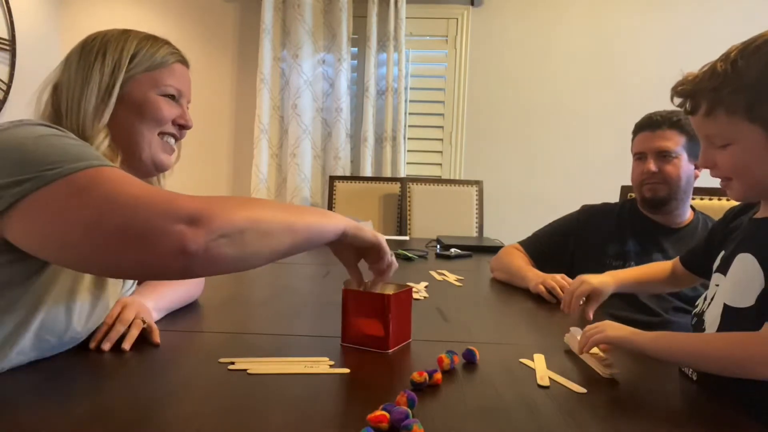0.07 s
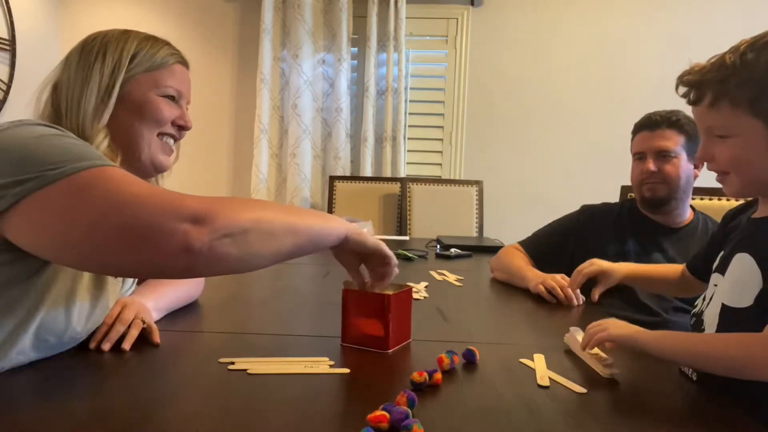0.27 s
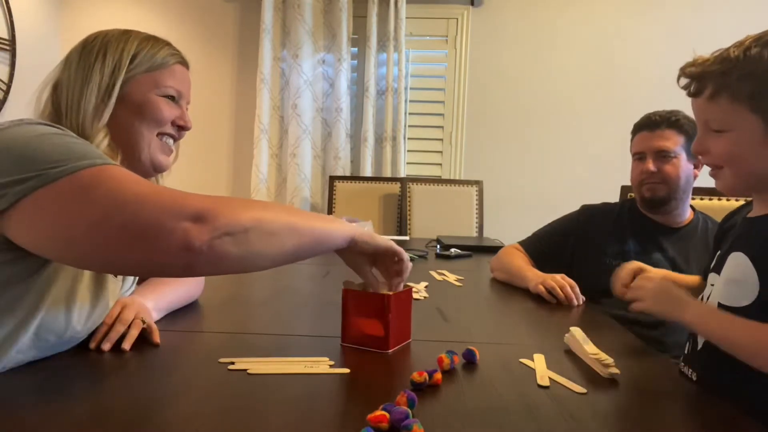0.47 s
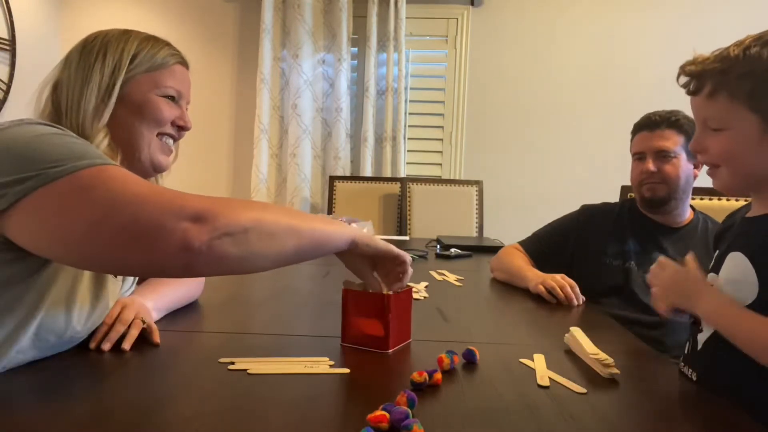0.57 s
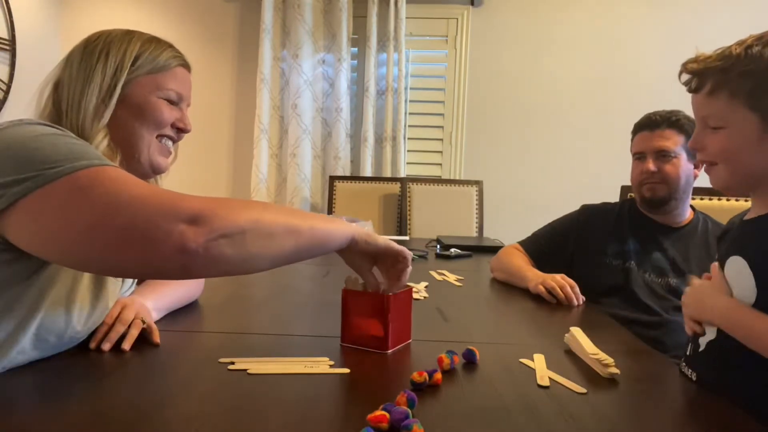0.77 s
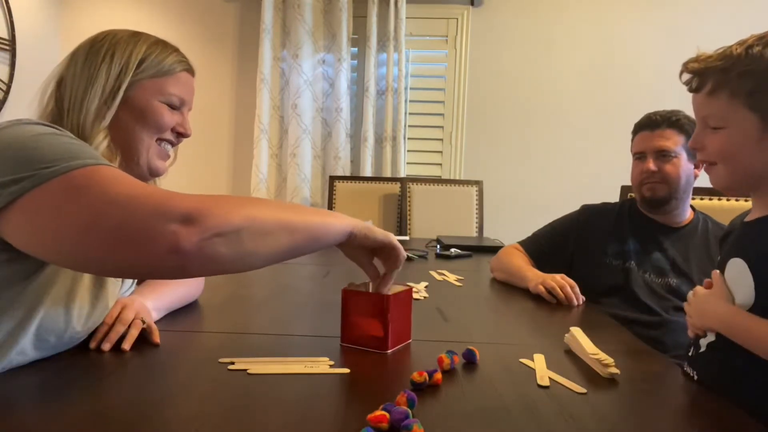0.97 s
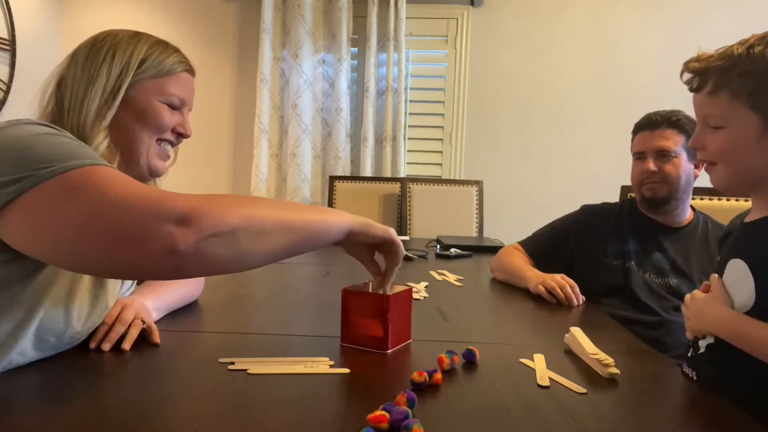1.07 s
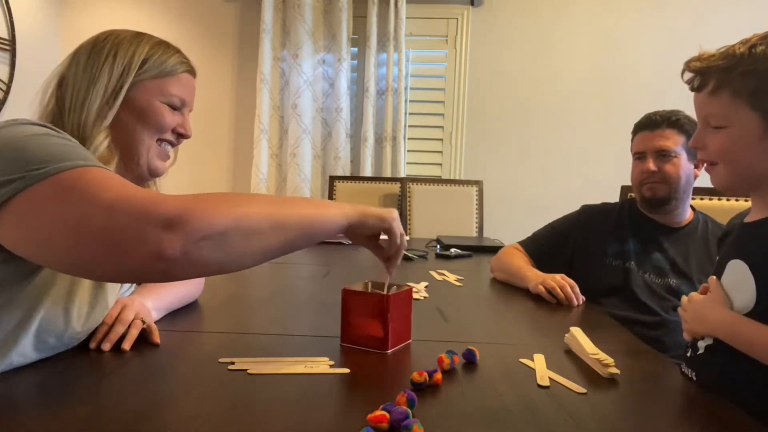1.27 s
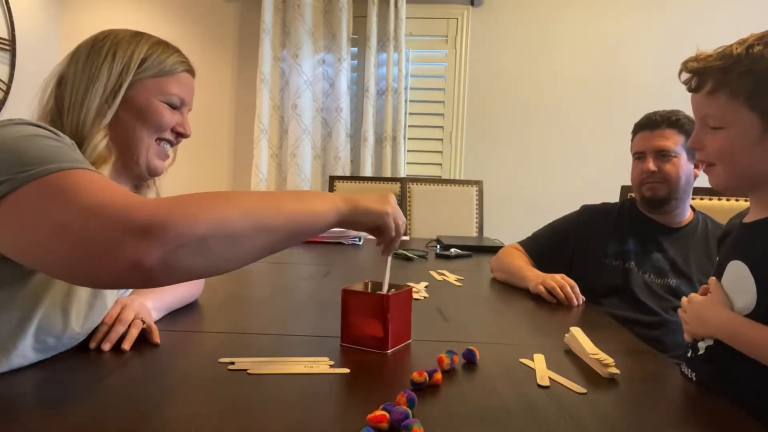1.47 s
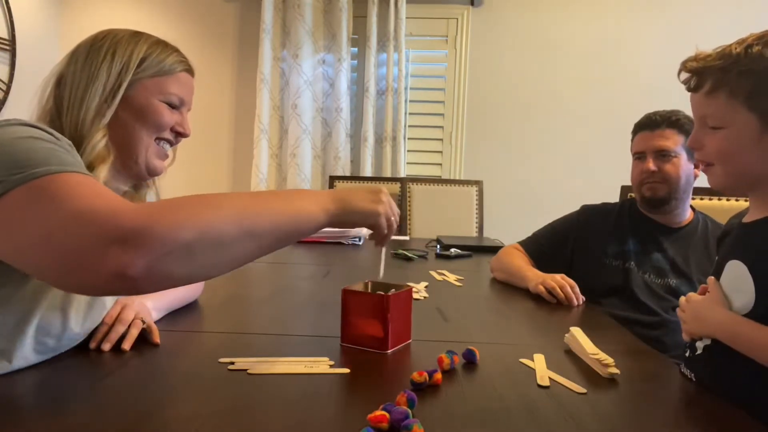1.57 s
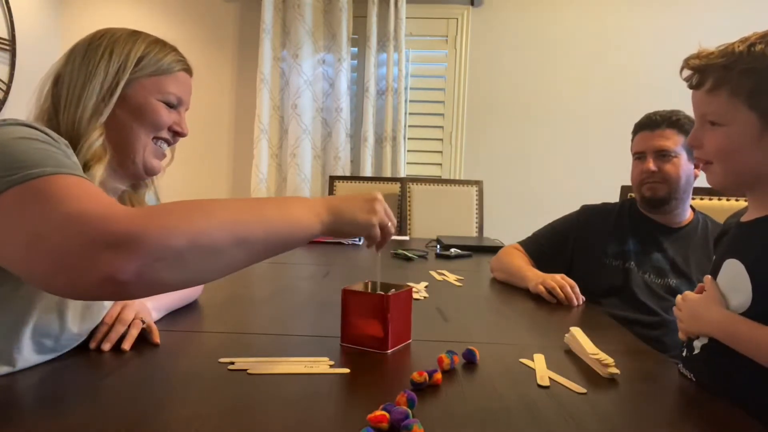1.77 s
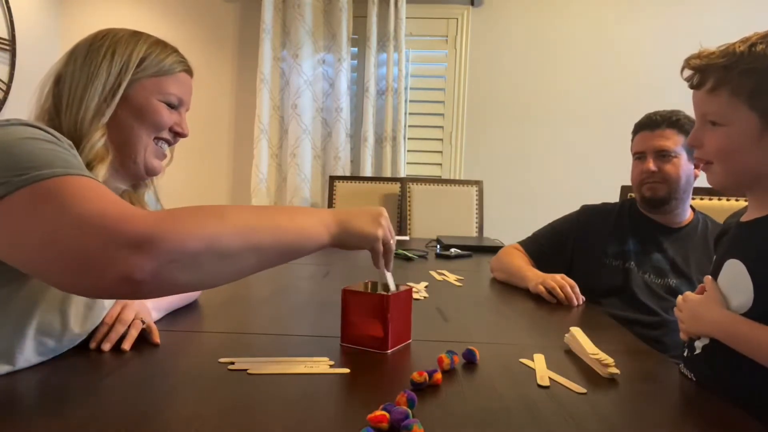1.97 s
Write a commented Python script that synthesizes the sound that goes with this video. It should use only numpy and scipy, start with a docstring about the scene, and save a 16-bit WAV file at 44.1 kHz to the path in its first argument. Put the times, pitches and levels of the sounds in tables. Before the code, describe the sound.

A hand stirs thin wooden sticks in a little tin on a dining table, giving uneven dry knocks, short tinny rings and small rattles, over very quiet low room hum, heard close in stereo with a short room tail.

```python
"""Wooden craft sticks knock in a small metal tin on a dining table as a hand rummages, a metre from a phone.
Each knock is a short chatter of contacts that rings the tin walls, the hollow of the tin and the wood.
Small rattles, made of many random contacts, fill the gaps, and one stick slides out as filtered noise.
A furnished room answers with a table bounce and a fading tail, over its low hum of filtered noise."""
import sys
import numpy as np
from scipy import signal
from scipy.fft import rfft, irfft, next_fast_len
from scipy.io import wavfile

SR = 44100
rng = np.random.default_rng(int(sys.argv[2]) if len(sys.argv) > 2 else 0)


def volts_from_decibels(level):
    """Turn decibel levels (scalar or array-like) into linear amplitude factors."""
    exponent = np.asarray(level, float) / 20
    return 10 ** exponent


def bounce(signal):
    """Save signal as a 16-bit WAV file at the path given by the first command-line argument."""
    frames = np.transpose(np.atleast_2d(signal))
    limited = np.clip(frames, -1, 1)
    pcm = np.round(limited * 32767).astype(np.int16)
    wavfile.write(sys.argv[1], SR, pcm)


N = 89126  # length of the scene [samples]


def table(x, rows, log=False):
    """Reads a table at x, with straight lines between its rows."""
    r = np.array(rows, float)
    if log:
        return np.interp(np.log(x + 1), np.log(r[:, 0]), r[:, 1])
    return np.interp(x, r[:, 0], r[:, 1])


def unit(x):
    """Scales a sound to an rms of 1."""
    return x / np.sqrt(np.mean(x ** 2))


def colour(x, rows):
    """Makes each pitch louder or softer, following (frequency [Hz], level [dB]) points."""
    n = x.shape[-1]
    hz = np.arange(n // 2 + 1) * SR / n
    return irfft(rfft(x) * volts_from_decibels(table(hz, rows, log=True)), n)


def fade(t, t60):
    """A natural decay: 60 dB down after t60 seconds."""
    return np.exp(-np.log(1000) * t / t60)


def band_noise(low_hz, high_hz, shape):
    """Random noise kept between two frequencies."""
    sos = signal.butter(2, [low_hz, high_hz], "band", fs=SR, output="sos")
    return signal.sosfilt(sos, rng.standard_normal(shape))


def ring(hz, t60):
    """One way an object vibrates: a decaying sine, 0.4 s long."""
    t = np.arange(int(SR * .4)) / SR
    return np.sin(2 * np.pi * hz * t) * fade(t, max(t60, .003))


# Tone of the household hum: (frequency [Hz], relative level [dB])
HUM_COLOUR = [(25, -31.5), (36, -15), (48, -7), (100, -5), (120, 1), (150, -13.5), (192, 2.5), (240, -8.5),
              (330, -16), (600, -17), (950, -37.5), (1400, -49), (2650, -47), (5000, -57), (10000, -46.5),
              (15400, -62)]
# Loudness of the hum: (time [s], level [dB])
HUM_LOUDNESS = [(0.0, -64), (0.42, -60), (0.76, -63.5), (1.29, -62.5), (1.5, -63.5), (1.79, -69),
                (2.02, -57)]
HUM_WIDTH = .3  # size of the part that differs left and right, next to the shared part


def hum():
    """Low household hum: coloured noise, mostly shared by both sides, that slowly swells and sinks."""
    mid, side = colour(rng.standard_normal((2, N)), HUM_COLOUR)
    both = mid + HUM_WIDTH * side * np.array([[1], [-1]])
    return volts_from_decibels(table(np.arange(N) / SR, HUM_LOUDNESS)) * unit(both)


# How long the room rings at each pitch: (frequency [Hz], t60 [s])
ROOM_DECAY = [(200, 0.22), (1400, 0.45), (4000, 0.25), (10000, 0.16)]
# How far left and right differ in the tail: (frequency [Hz], side size next to the shared part [ratio])
ROOM_WIDTH = [(200, 0.46), (700, 0.77), (2000, 0.48), (5000, 0.92), (8000, 0.1), (14000, .1)]
TAIL_DB, TAIL_RISE_S = -4.5, 0.0027
BOUNCE_S, BOUNCE_DB = .0012, -17  # the echo off the table


def room(x):
    """Direct sound, a table bounce, then a diffuse tail whose high treble dies first."""
    t = np.arange(SR // 2) / SR
    tail = np.zeros((2, len(t)))  # the shared part and the side part
    for low_hz in 60 * 2. ** np.arange(8):
        middle_hz = np.sqrt(2) * low_hz
        band = band_noise(low_hz, 2 * low_hz, (2, len(t)))
        band[1] *= table(middle_hz, ROOM_WIDTH, log=True)
        tail += band * fade(t, table(middle_hz, ROOM_DECAY, log=True))
    tail *= np.clip(t / TAIL_RISE_S, 0, 1) * volts_from_decibels(TAIL_DB) / np.sqrt(np.sum(tail[0] ** 2))
    response = tail[0] + tail[1] * np.array([[1], [-1]])
    response[:, 0] += 1  # direct sound
    response[:, int(BOUNCE_S * SR)] += volts_from_decibels(BOUNCE_DB)
    return signal.fftconvolve(x[None], response, axes=1)[:, :N]


# A stick drawn along the others: (time [s], level [dB])
SLIDE_LOUDNESS = [(1.54, -79), (1.558, -92), (1.574, -70), (1.624, -73), (1.662, -71), (1.78, -104)]
# Tone of that friction: (frequency [Hz], relative level [dB])
SLIDE_TONE = [(1200, -9), (2500, -16), (3500, -8.5), (6000, -9.5), (8200, -3.5), (10300, -13), (12500, -10),
              (15000, -15.5), (16300, -29)]


def slide():
    """Smooth wood-on-wood friction: a coloured hiss, silent outside its listed times."""
    t = np.arange(N) / SR
    on = (t > SLIDE_LOUDNESS[0][0]) * (t < SLIDE_LOUDNESS[-1][0])
    hiss = unit(colour(rng.standard_normal(N), SLIDE_TONE))
    return on * volts_from_decibels(table(t, SLIDE_LOUDNESS)) * hiss


# Tone of wood tapping wood: (frequency [Hz], relative level [dB])
CLICK_COLOUR = [(600, -30), (1100, 0.5), (2000, -5), (3200, -8.5), (5500, -8.5), (8000, -16.5),
                (10500, -19.5), (12800, -17.5), (15000, -43.5), (16300, -61.5)]
CLICK_T60_S = 0.011


def click():
    """The dry tick of wood on wood: coloured noise that dies at once."""
    t = np.arange(2048) / SR
    return unit(colour(rng.standard_normal(len(t)), CLICK_COLOUR)) * fade(t, CLICK_T60_S)


# Pitches at which the tin walls ring: frequency [Hz], before detuning
WALL_HZ = [378, 570, 670, 780, 926, 973, 1250, 1412, 1590, 2004, 2153, 2411, 2600, 2860, 3520, 3960, 4253]
# How each wall pitch rings: (relative level [dB], longest t60 [s], before the damping by the sticks)
WALL_MODES = [(-16.5, 0.3), (-9.5, 0.082), (-6, 0.059), (-7.5, 0.05), (-3.5, 0.063), (-13, 0.085),
              (-13, 0.082), (-14.5, 0.096), (-11.5, 0.085), (-5.5, 0.085), (-6.5, 0.038), (-8, 0.031),
              (-12, 0.099), (-9.5, 0.037), (-18, 0.12), (-16, 0.12), (-17.5, 0.087)]
HELD_T60_S = .09  # the sticks inside damp the walls: no mode rings longer, and less above 2500 Hz
DETUNE = .005  # fingers and sticks load the walls: typical pitch change [fraction]


def tin(scatter_db, detune):
    """The walls, each mode struck harder or softer and bent in pitch by where the stick lands."""
    walls = 0
    for hz, (db, t60), extra_db, bend in zip(WALL_HZ, WALL_MODES, scatter_db, detune):
        damped_t60 = min(t60, HELD_T60_S * min(1, 2500 / hz))
        walls = walls + volts_from_decibels(db + extra_db) * ring(hz * (1 + bend), damped_t60)
    return walls


# How hard the fingers stir the sticks: (time [s], level [dB], before the rattle's own settings)
STIRRING = [(0, -102), (.035, -68.5), (0.058, -57), (.2, -71), (.27, -106), (0.439, -73.5), (.46, -52),
            (.6, -52), (.68, -60), (0.762, -57), (.9, -53.5), (.99, -58), (1.1, -37.5), (1.22, -43.5),
            (1.28, -54), (1.34, -49.5), (1.418, -69), (1.6, -94.5), (1.82, -73), (1.838, -37.5),
            (1.93, -44.5), (2.02, -33.5)]
STICKS, RATTLE_PER_S = 6, 900  # contacts per second, all sticks together
RATTLE_DB, RATTLE_SPREAD_DB = -8, 1.97  # the spread is the average random boost of a contact
RATTLE_TIN_DB, RATTLE_CLICK_DB, RATTLE_SCATTER_DB = -11.5, -6.5, 4


def rattle():
    """Many small uneven contacts while the fingers stir; each stick has its own tick and spot on the wall."""
    stir_db = table(np.arange(N) / SR, STIRRING)
    size = volts_from_decibels(RATTLE_DB + stir_db + RATTLE_SPREAD_DB * rng.exponential(size=N))
    out = 0
    for _ in range(STICKS):
        hits = (rng.random(N) < RATTLE_PER_S / STICKS / SR) * size * rng.choice([-1, 1], N)
        scatter_db, bend = rng.standard_normal((2, len(WALL_MODES))) * [[RATTLE_SCATTER_DB], [2 * DETUNE]]
        body = volts_from_decibels(RATTLE_TIN_DB) * tin(scatter_db, bend)
        tick = volts_from_decibels(RATTLE_CLICK_DB) * click()
        body[:len(tick)] += tick
        out = out + signal.fftconvolve(hits, body)[:N]
    return out


SNAP_HZ, SNAP_T60_S, SNAP_DB = 11600, 0.0047, -7.5  # level is over the tick


def snap():
    """Bright edge of the first contact: a few milliseconds of treble crack."""
    t = np.arange(1024) / SR
    return unit(band_noise(SNAP_HZ / 1.2, SNAP_HZ * 1.2, len(t))) * fade(t, SNAP_T60_S)


CHATTER_PER_S = 1100  # contacts per second


def chatter(length):
    """A dying run of random contacts, total energy 1."""
    t = np.arange(6000) / SR
    happens = rng.random(len(t)) < CHATTER_PER_S / SR
    contacts = happens * rng.standard_normal(len(t)) * np.exp(-t / max(length, .0005))
    contacts[0] = 0.67  # the first contact always happens
    return contacts / np.sqrt(np.sum(contacts ** 2))


# The table top under the tin: (frequency [Hz], relative level [dB], t60 [s])
TABLE_MODES = [(235, -1.5, 0.014), (298, 2, 0.013), (398, -12, 0.094)]


def table_thud():
    """The table top shaken through the tin: a few short low rings."""
    return sum(volts_from_decibels(db) * ring(hz, t60) for hz, db, t60 in TABLE_MODES)


# Every knock: (time [s], level [dB], hollow knock [Hz], then tin ring, click and thud levels
# next to the knock [dB, the tin's before TIN_DB], chatter length [s])
BLOWS = [(0.061, -35.5, 592, -4.5, -18, -7, 0.0099), (0.084, -45, 885, -18, -35, -4, 0.0047),
         (0.161, -43, 890, -5, -21, -7, 0.0066), (0.184, -45.5, 607, -1, -12, -1, 0.0044),
         (0.451, -41.5, 922, 11.5, -6, -18, 0.029), (0.535, -38.5, 1013, 9, -4.5, -7, 0.011),
         (0.557, -31.5, 769, -4, -7.5, -45, 0.005), (0.583, -37.5, 890, -3, -10.5, 0.5, 0.0059),
         (0.745, -42.5, 805, -1, -32, -40, 0.01), (0.769, -42, 763, 1.5, -6.5, 1.5, 0.036),
         (0.818, -36, 874, 9.5, -5, -41, 0.011), (0.879, -41, 678, -23, -11, -1, 0.0095),
         (0.996, -24, 797, -5, -17, -20, 0.0091), (1.011, -34, 825, 4.5, -41.5, -28.5, 0.018),
         (1.077, -27.5, 754, 5.5, -1, -44, 0.0085), (1.086, -41, 790, 15, -23, -32, 0.028),
         (1.16, -17.5, 933, -13.5, -14, -35, 0.0049), (1.184, -31, 840, 8, -18, -16, 0.0042),
         (1.203, -32, 1042, -4, -8.5, -36, 0.0087), (1.3, -36, 750, 5, -1.5, -33, 0.01),
         (1.329, -39.5, 903, -4.5, -19.5, -28, 0.0082), (1.831, -39.5, 798, 11, 10, -34, 0.035),
         (1.879, -22.5, 855, -4, -7.5, 1, 0.0053), (1.892, -21, 720, -6, -5, -46, 0.004),
         (1.922, -36, 927, -6.5, -4.5, -19, 0.036), (1.941, -27.5, 926, -10, 3, -33, 0.0044),
         (1.945, -16, 920, -1, -3, -57, 0.015), (1.971, -28.5, 934, 6.5, 4, -38, 0.019),
         (1.995, -39, 980, -1, -11, -34, 0.013)]
TIN_DB, TIN_SCATTER_DB = -9.5, 2
KNOCK_T60_S, RING_ON = 0.028, 1.43  # a longer chatter lengthens the hollow ring: seconds per second
PUSH_S, RISE_S = 0.00013, .002  # soft wood pushes gradually


def knocks():
    """A hollow knock and a thud on the table, with a chatter of ticks that rings the tin, for each blow."""
    out = np.zeros(N + SR)
    push = np.hanning(int(PUSH_S * SR) + 3)
    for start_s, db, hollow_hz, tin_db, click_db, thud_db, length in BLOWS:
        scatter_db, bend = rng.standard_normal((2, len(WALL_MODES))) * [[TIN_SCATTER_DB], [DETUNE]]
        walls = volts_from_decibels(TIN_DB + tin_db) * tin(scatter_db, bend)
        walls = np.convolve(walls, push / push.sum())
        tick = volts_from_decibels(click_db) * click()
        walls[:len(tick)] += tick
        body = signal.fftconvolve(walls, chatter(length))

        knock = ring(hollow_hz, KNOCK_T60_S + RING_ON * length) + volts_from_decibels(thud_db) * table_thud()
        rise = 1 - np.exp(-np.arange(len(knock)) / SR / RISE_S)
        body[:len(knock)] += knock * rise
        edge = volts_from_decibels(click_db + SNAP_DB) * snap()
        body[:len(edge)] += edge

        i = int(start_s * SR)
        out[i:i + len(body)] += volts_from_decibels(db) * body
    return out[:N]


CARRY_HZ = 205  # the small tin radiates little below


def scene():
    """All sources, with the lows removed, answered by the room, plus the hum."""
    sources = knocks() + rattle() + slide()
    low_cut = signal.butter(4, CARRY_HZ, "high", fs=SR, output="sos")
    return room(signal.sosfilt(low_cut, sources)) + hum()


def band_limit(x):
    """A steep low-pass at the top of the band."""
    return signal.sosfilt(signal.butter(12, 15510, fs=SR, output="sos"), x)


# Phase between the two microphone ports: (frequency [Hz], lead of the left port [radians])
PORT_PHASE = [(0, 0), (2000, -.6), (5500, -1.6), (6900, -1.2), (8100, 0), (10400, np.pi),
              (13000, 2 * np.pi), (14900, 3 * np.pi), (15600, 3.2 * np.pi)]


def record(dry):
    """Two microphone ports whose phases part with pitch, each turned by half the difference."""
    n = next_fast_len(N + 4096)
    lead = table(np.arange(n // 2 + 1) * SR / n, PORT_PHASE)
    turn = np.exp(.5j * lead * np.array([[1], [-1]]))
    mix = irfft(rfft(dry, n) * turn, n)[:, :N]
    return band_limit(mix)


dry = scene()
out = record(dry)
bounce(out)
```